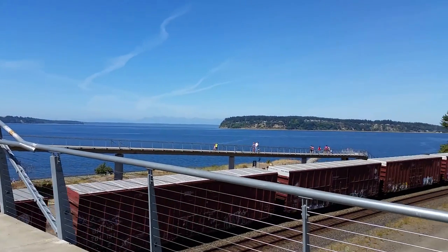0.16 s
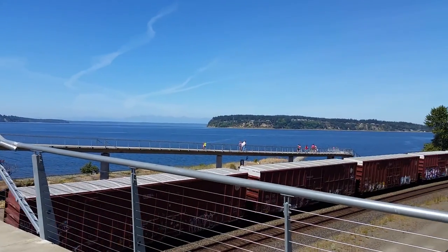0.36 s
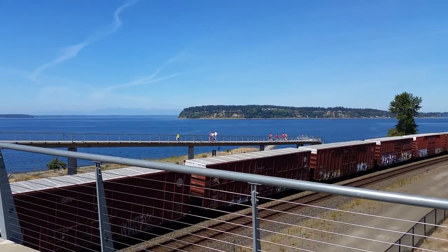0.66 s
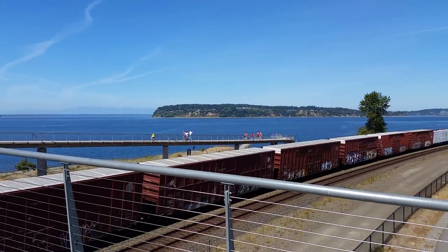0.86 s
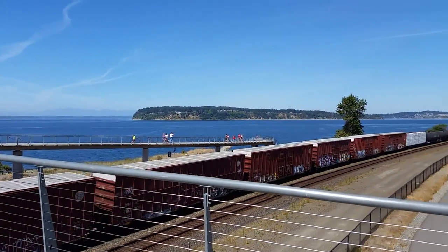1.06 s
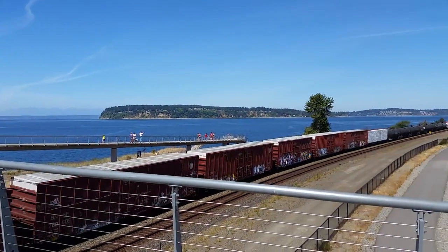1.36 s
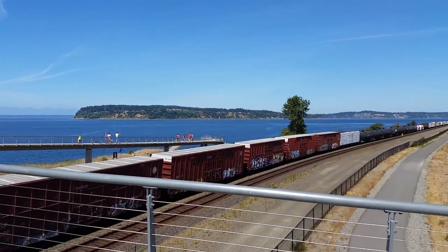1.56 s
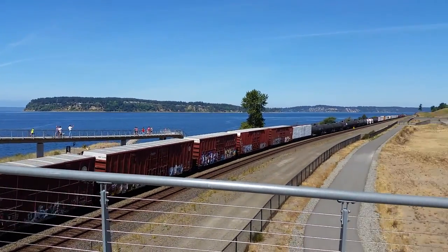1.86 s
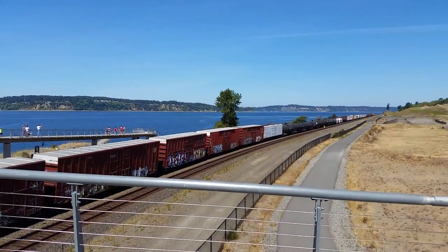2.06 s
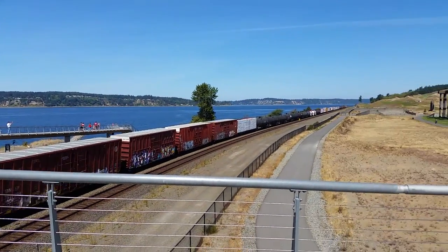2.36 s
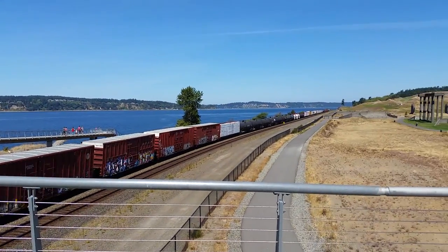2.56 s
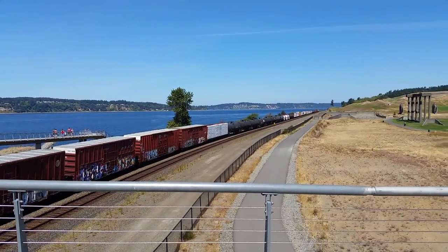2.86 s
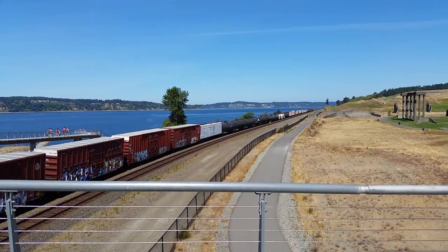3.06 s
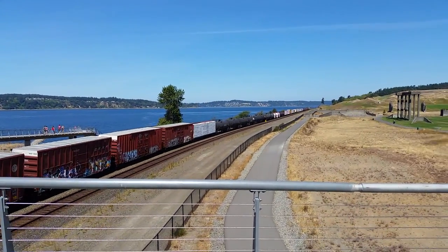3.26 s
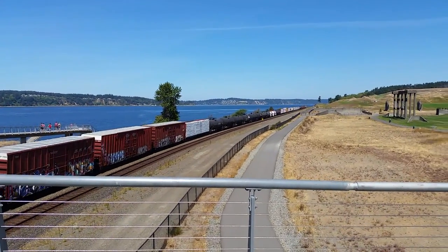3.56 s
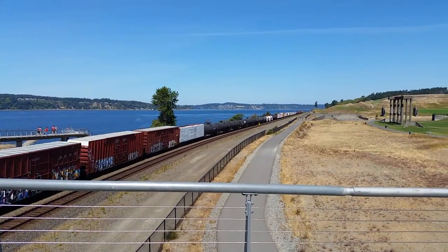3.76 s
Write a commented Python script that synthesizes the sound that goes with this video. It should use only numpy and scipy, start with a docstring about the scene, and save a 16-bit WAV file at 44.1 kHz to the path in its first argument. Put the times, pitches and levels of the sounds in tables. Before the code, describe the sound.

Freight wagons rumble and roar close by on the right, one hollow drone swelling early; knocks and rasps give way to sharp, wavering wheel squeal from two seconds, in open windy air, the left side faint and muffled.

```python
"""A long freight train rolls round a bend below a footbridge, in open air with some wind.
Throughout, filtered noise makes the wagons rumble, roar and hiss; one boxcar's drone swells early on.
Dull knocks (short bursts of a tone) and coarse scrapes (swells of noise) come in the first half.
Wheel flanges grind in surges of bright hiss, with wavering sine squeals; louder from two seconds on.
The right side takes most of it; the left is faint and muffled, with a ring near 3.8 kHz."""
import sys
import numpy as np
from scipy import signal
from scipy.fft import rfft, irfft
from scipy.io import wavfile
from scipy.ndimage import uniform_filter1d

SR = 44100
rng = np.random.default_rng(int(sys.argv[2]) if len(sys.argv) > 2 else 0)


def digitize_waveform(pressure):
    """Quantize a signal to 16-bit integers and store it at the path in sys.argv[1].

    Rows of a 2-D input are taken as channels; values are limited to [-1, 1].
    """
    field = np.atleast_2d(pressure).T
    bounded = np.clip(field, -1, 1)
    quanta = np.round(bounded * 32767).astype(np.int16)
    wavfile.write(sys.argv[1], SR, quanta)


N = 172431
TIME = np.arange(N) / SR
FREQS = np.maximum(np.fft.rfftfreq(N, 1 / SR), 1)

# how hard the flanges grind on the rail: time_s, level_db
GRIND_LEVEL = [(0, -40), (.14, -47.5), (.25, -52.5), (.32, -55.5), (.42, -53.5), (.5, -57.5), (.78, -56),
               (.84, -47.5), (.885, -57), (.915, -44.5), (.97, -43.5), (1.04, -47.5), (1.1, -46),
               (1.16, -39), (1.32, -45), (1.4, -35.5), (1.55, -42.5), (1.74, -46.5), (1.86, -43.5),
               (1.94, -50.5), (1.995, -48.5), (2.04, -27.5), (2.09, -27), (2.32, -31.5), (2.55, -30.5),
               (2.84, -42), (3.08, -43), (3.14, -33), (3.25, -31), (3.35, -30.5), (3.44, -37), (3.6, -37.5),
               (3.73, -31.5), (3.91, -35)]
# colour of the grinding hiss at its mean level: pitch_hz, left_db_per_hz, right_db_per_hz
GRIND_SPECTRUM = [(1500, -110, -92), (2920, -95, -86.5), (3720, -83, -86.5), (4700, -88.5, -85),
                  (5300, -92.5, -89.5), (6300, -98.5, -88.5), (6950, -104, -89), (8790, -120, -82),
                  (9500, -122, -74), (11140, -119, -71.5), (12660, -117, -75.5), (13900, -117, -80),
                  (15800, -117, -84)]


def from_db(db):
    """Turn decibels into a gain."""
    return 10 ** (np.asarray(db) / 20)


def rms_one(x):
    """Scale a signal to an rms of 1."""
    return x / np.sqrt(np.mean(x ** 2) + 1e-20)


def in_time(rows):
    """Draw straight lines through (time, value) rows, giving a value for every sample."""
    return np.interp(TIME, *np.transpose(rows))


def swing(rows):
    """A level curve in dB, counted from its own mean."""
    curve = in_time(rows)
    return curve - curve.mean()


def drift(rate_hz):
    """A smooth random wander with an rms of 1; a higher rate wanders faster."""
    step = 40  # samples between the points of the wander
    r = np.exp(-2 * np.pi * step * rate_hz / SR)
    white = rng.standard_normal(N // step + 2002)
    slow = signal.lfilter([1], [1, -2 * r, r * r], white)[2000:]  # drop the filter's start
    return np.interp(np.arange(N) / step, np.arange(len(slow)), rms_one(slow))


def noise(spectrum, alike=0):
    """Noise coloured for left and right; alike is how far the two sides match, from 0 to 1."""
    hz, *sides = np.transpose(spectrum)
    gains = from_db([np.interp(np.log(FREQS), np.log(hz), side) for side in sides])
    # beyond the ends of the table the sound falls away
    low_skirt = np.minimum(1, FREQS / hz[0]) ** 2
    high_skirt = np.minimum(1, hz[-1] / FREQS) ** 2
    own, right = rng.standard_normal((2, N))
    alike = np.clip(alike, 0, 1)
    left = alike * right + np.sqrt(1 - alike ** 2) * own
    return irfft(rfft([left, right]) * gains * low_skirt * high_skirt, N) * np.sqrt(SR / 2)


def noise_band(hz, width_hz):
    """Noise gathered round one pitch, rms 1: a narrow width rings, a broad one hisses."""
    peak = 1 / (1 + ((FREQS - hz) / width_hz) ** 2)
    return rms_one(irfft(rfft(rng.standard_normal(N)) * peak, N))


def swell(s, rise, fall):
    """A rounded rise and fall about a moment; all in seconds."""
    return np.exp(-((TIME - s) / np.where(TIME < s, rise, fall)) ** 2)


def to_right(x, left_db):
    """Place a sound on the right, with a weaker copy on the left."""
    return np.array([from_db(left_db) * x, x])


def wagons(spectrum, level, shake_db, rate_hz, alike=0):
    """Noise of the running wagons: it follows a level curve and is shaken unevenly."""
    return noise(spectrum, alike) * from_db(swing(level) + shake_db * drift(rate_hz))


def rumble():
    """The deep rumble of the wagons, as low noise that rises and falls."""
    # pitch_hz, left_db_per_hz, right_db_per_hz, at mean level
    rumble_spectrum = [(44, -69, -46.5), (71.7, -62, -34), (112, -58, -35), (195.3, -73.5, -39.5),
                       (332, -73.5, -50.5), (676, -105, -77)]
    # time_s, level_db (counted from its mean)
    rumble_level = [(0, -17.5), (0.25, -19.5), (0.45, -20.5), (0.65, -25), (0.78, -17), (0.95, -24),
                    (1.05, -20.5), (1.25, -26.5), (1.45, -23), (1.7, -25), (2, -22), (2.3, -21),
                    (2.6, -19.5), (2.9, -21), (3.15, -21.5), (3.4, -17), (3.65, -17.5), (3.9, -29.5)]
    return wagons(rumble_spectrum, rumble_level, shake_db=0.26, rate_hz=41)


def roar():
    """The wagons' roar, as higher noise that is partly the same on both sides."""
    # pitch_hz, left_db_per_hz, right_db_per_hz, at mean level
    roar_spectrum = [(96, -72, -60.5), (256, -70, -42.5), (414, -76.5, -48), (686, -81, -56.5),
                     (967, -89.5, -63), (1610, -104, -74.5), (2970, -102, -85.5), (5600, -120, -108)]
    # time_s, level_db (counted from its mean)
    roar_level = [(0, -22), (0.2, -23.5), (0.4, -24.5), (0.65, -25.5), (0.85, -24), (1.05, -28),
                  (1.3, -29.5), (1.6, -31), (2, -30.6), (2.3, -31), (2.6, -25), (2.85, -26.3), (3.1, -26.5),
                  (3.45, -29.5), (3.9, -29.5)]
    return wagons(roar_spectrum, roar_level, shake_db=1.81, rate_hz=49, alike=.45)


def boxcar():
    """The hollow drone of the nearest wagon swells and recedes as it passes."""
    # pitch_hz, left_db_per_hz, right_db_per_hz, at its loudest
    boxcar_spectrum = [(80, -58, -67), (129, -52, -35), (185, -61, -33.5), (247, -62, -35), (310, -68, -44),
                       (420, -77.5, -50.5), (785, -95, -59), (1400, -108, -78)]
    # loudest_at_s, rise_s, fall_s
    boxcar_pass = (0.39, 0.21, 0.6)
    return noise(boxcar_spectrum) * swell(*boxcar_pass)


def rolling_hiss():
    """The hiss of rolling wheels, as treble noise that is uneven in level."""
    # pitch_hz, left_db_per_hz, right_db_per_hz, at mean level
    rolling_spectrum = [(595, -105, -96), (1240, -82, -70), (2000, -94.5, -75.5), (3000, -88.5, -78),
                        (3680, -77, -81.5), (4800, -85.5, -89.5), (5180, -87, -94), (5630, -109, -110),
                        (9000, -121, -124), (12500, -111, -122), (15800, -111, -122)]
    # time_s, level_db (counted from its mean)
    rolling_level = [(0, -43.5), (.3, -51.5), (.8, -49), (1.05, -50.5), (1.6, -46), (2.0, -44), (2.4, -43),
                     (2.62, -41.5), (2.8, -41), (2.95, -41.5), (3.07, -38.5), (3.33, -41), (3.43, -46.5),
                     (3.65, -42.5), (3.91, -38.5)]
    return wagons(rolling_spectrum, rolling_level, shake_db=1.3, rate_hz=19, alike=0.11)


def grinding():
    """Flanges rub the rail: chattering hiss that brightens as it grows, and ringing wheel modes."""
    # how much of the grinding's swing each part of the hiss follows: pitch_hz, share (0 to 1)
    grind_follows = [(3000, 0.53), (4700, 0.57), (5600, 0.77), (11000, 0.81), (15000, 1.0)]
    # wheel modes kept ringing by friction: pitch_hz, width_hz, level_db (against the grinding level)
    wheel_modes = [(6330, 85, -22.5), (9520, 120, -12.5), (10030, 200, -12), (11280, 70, -8),
                   (12140, 110, -16), (12600, 70, -13), (14050, 150, -17)]
    chatter_db = 0.83 * drift(34)
    friction = rfft(noise(GRIND_SPECTRUM))
    push_db = swing(GRIND_LEVEL)
    hz, shares = np.transpose(grind_follows)
    hiss = 0
    # overlapping bands, each fading into the next, that together make the whole hiss
    for band, share in zip(np.eye(len(hz)), shares):
        part = irfft(friction * np.interp(FREQS, hz, band), N)
        hiss = hiss + part * from_db(share * push_db)
    modes = sum(from_db(db) * noise_band(pitch, width) for pitch, width, db in wheel_modes)
    modes = modes * from_db(in_time(GRIND_LEVEL))
    return (hiss + to_right(modes, left_db=-52)) * from_db(chatter_db)


def scrapes():
    """Brief, coarse rasps of a flange, steel on steel, as short swells of noise."""
    # pitch_hz, left_db_per_hz, right_db_per_hz, before each scrape's level
    scrape_spectrum = [(1300, -110, -84), (2630, -88, -66.5), (3700, -75, -71), (4500, -90, -75.5),
                       (5970, -100, -84.5), (9000, -120, -79), (15000, -120, -84)]
    # loudest_at_s, half_length_s, level_db
    scrape_events = [(0.951, 0.046, -7), (1.156, 0.058, -1), (1.397, 0.049, 1), (2.038, 0.038, -7)]
    level = sum(from_db(db) * swell(s, half, half) for s, half, db in scrape_events)
    return noise(scrape_spectrum) * level


def shimmer(x, depth_db):
    """Narrow bands wax and wane each on its own, like the crowded modes of many wheels."""
    cells = signal.stft(x, nperseg=1024)[2]
    field = rng.standard_normal(cells.shape)
    field = uniform_filter1d(field, size=3, axis=1)  # smooth across pitch
    field = uniform_filter1d(field, size=16, axis=2)  # smooth in time
    gains = rms_one(from_db(depth_db * rms_one(field)))
    return signal.istft(cells * gains, nperseg=1024)[1][:, :N]


def squeals():
    """Single wheel modes swell into thin, wavering tones that sag in pitch as the wheel goes by."""
    # loudest_at_s, rise_s, fall_s, pitch_hz, waver_hz, level_db
    squeal_events = [(.1, .2, .2, 9440, 45, -45), (.06, .2, .2, 11200, 70, -50),
                     (.06, .2, .15, 6080, 60, -66), (.96, .054, .07, 9420, 40, -49),
                     (2.09, .05, .08, 9753, 8, -33), (2.08, .04, .1, 10272, 6, -31),
                     (2.065, .02, .07, 10524, 12, -33), (2.08, .025, .03, 10760, 70, -31),
                     (2.1, .07, .07, 11466, 14, -35), (2.18, .04, .04, 13178, 10, -38),
                     (2.15, .025, .05, 14303, 10, -40), (2.16, .06, .06, 15110, 14, -43),
                     (2.27, .08, .1, 12795, 14, -39), (2.65, .15, .16, 11364, 42, -35.3),
                     (2.64, .15, .15, 12925, 50, -40), (2.88, .12, .3, 11400, 16, -45),
                     (3.22, .08, .08, 11390, 40, -38), (3.33, .05, .07, 12866, 12, -35),
                     (3.38, .07, .08, 11273, 14, -35.3), (3.74, .26, .25, 11285, 34, -38.5),
                     (3.72, .22, .22, 12850, 45, -43)]
    sag_hz_per_s, waver_rate_hz = 220, 60
    flutter_db, flutter_rate_hz = 4, 45
    tones = 0
    for s, rise, fall, hz, waver, db in squeal_events:
        pitch = hz - sag_hz_per_s * (TIME - s) + waver * drift(waver_rate_hz)
        level = from_db(db + flutter_db * drift(flutter_rate_hz)) * swell(s, rise, fall)
        # adding up the pitch gives the phase; the root of 2 gives the sine an rms of 1
        tones = tones + level * np.sqrt(2) * np.sin(2 * np.pi * np.cumsum(pitch) / SR)
    return to_right(tones, left_db=-46)


def pings():
    """Flanges stick and slip, pinging at random pitches: a metallic grain in the hiss."""
    pings_per_s, half_s = 60, .022
    range_hz = (9300, 15200)
    ping_db = -15  # against the grinding level
    out = np.zeros(N)
    hz, _, colour = np.transpose(GRIND_SPECTRUM)
    for when, where in rng.random((int(pings_per_s * N / SR), 2)):
        s = when * N / SR
        pitch = np.interp(where, [0, 1], range_hz)
        near = np.abs(TIME - s) < np.pi * half_s
        t = TIME[near] - s
        # a ping is stronger where the right side's hiss is stronger
        gain = from_db(np.interp(pitch, hz, colour) - colour.max())
        out[near] += gain * np.exp(-(t / half_s) ** 2) * np.sin(2 * np.pi * pitch * t)
    return to_right(out * from_db(ping_db + in_time(GRIND_LEVEL)), left_db=-46)


def rings_and_hiss_band():
    """Narrow rings and one broad band of hiss near 6.3 kHz swell slowly on both sides."""
    # loudest_at_s, half_length_s, pitch_hz, width_hz, left_db, right_db
    band_events = [(2.38, 0.073, 4680, 90, -43, -55), (2.9, 0.37, 3750, 130, -49, -59),
                   (3.08, 0.85, 2120, 130, -63, -45.5), (2.85, 0.4, 6300, 860, -63, -54),
                   (3.868, 0.12, 4640, 46, -49, -47)]
    bands = 0
    for s, half, hz, width, left_db, right_db in band_events:
        level = from_db([[left_db], [right_db]]) * swell(s, half, half)
        # each side has its own noise
        bands = bands + level * [noise_band(hz, width), noise_band(hz, width)]
    return bands


def knocks():
    """Dull knocks, each a burst of only a few cycles of a tone."""
    # middle_s, pitch_hz, level_db, half_length_s
    knock_events = [(.174, 800, -15, .0012), (.292, 760, -12.5, .0014), (.449, 690, -12, .002),
                    (.571, 800, -15.5, .001), (.691, 900, -17, .001), (.7385, 800, -15.5, .0012),
                    (.767, 850, -18, .001), (.8, 1000, -16.5, .001), (.945, 850, -14.5, .0012),
                    (1.098, 560, -16, .002), (1.198, 1090, -21, .0013), (1.268, 1520, -27, .001),
                    (1.3055, 1210, -20.5, .0007), (1.347, 1050, -14.5, .0008), (1.352, 1150, -21, .0007),
                    (1.381, 1430, -19, .001), (1.408, 860, -17.5, .001), (1.4165, 900, -16, .0009),
                    (1.477, 690, -16.5, .0016), (1.5966, 980, -14.5, .0007), (1.6005, 980, -23, .001),
                    (1.747, 1080, -19.5, .0009), (1.8435, 680, -15, .0012), (1.8485, 800, -18, .0016),
                    (1.8515, 690, -16.5, .0032)]
    bursts = 0
    for s, hz, db, half in knock_events:
        tone = np.sin(2 * np.pi * hz * (TIME - s))
        bursts = bursts + from_db(db) * swell(s, half, half) * tone
    return to_right(bursts, left_db=-39)


def wind():
    """Wind buffets the microphones: deep noise, different on each side."""
    # pitch_hz, left_db_per_hz, right_db_per_hz, at mean level
    wind_spectrum = [(18, -60, -44), (30.2, -67, -66), (49.4, -58, -40), (70, -56.5, -43.5),
                     (140, -72, -56.5)]
    # time_s, level_db (counted from its mean)
    wind_level = [(0, -11), (.6, 0.5), (1.2, 4), (1.7, 4), (2.3, 5), (2.9, 4), (3.4, -1), (3.9, 6)]
    return noise(wind_spectrum) * from_db(swing(wind_level))


def microphone_hiss():
    """The steady, faint hiss of the microphones themselves, as noise."""
    # pitch_hz, left_db_per_hz, right_db_per_hz
    floor_spectrum = [(1000, -112, -112), (9100, -119, -118), (15000, -119, -122)]
    return noise(floor_spectrum)


def scene():
    """Rumble, roar and rolling hiss, with the flanges on top and wind below."""
    body = rumble() + roar() + boxcar()
    steel = shimmer(rolling_hiss() + grinding() + scrapes(), depth_db=2.3)
    details = rings_and_hiss_band() + squeals() + pings() + knocks()
    return body + steel + details + wind() + microphone_hiss()


def record(dry):
    """A soft start; the highest peaks are rounded and the top is cut steeply."""
    fade_in_s, ceiling, cutoff_hz = .0015, .97, 15780
    fade = np.minimum(TIME / fade_in_s, 1)
    rounded = fade * dry / (1 + (dry / ceiling) ** 10) ** (1 / 10)
    low_pass = signal.ellip(16, .1, 80, cutoff_hz, fs=SR, output="sos")
    return signal.sosfilt(low_pass, rounded)


dry = scene()
out = record(dry)
digitize_waveform(out)
```